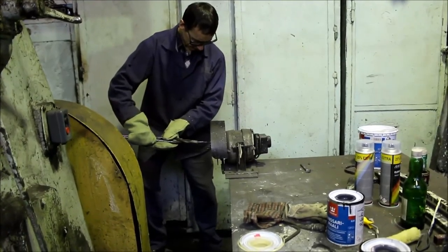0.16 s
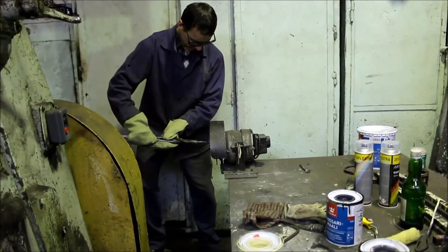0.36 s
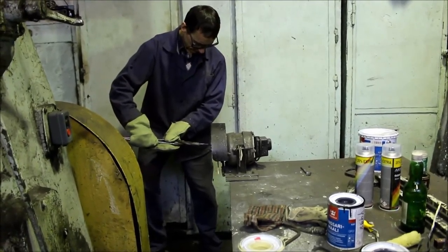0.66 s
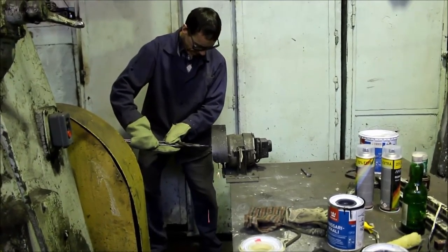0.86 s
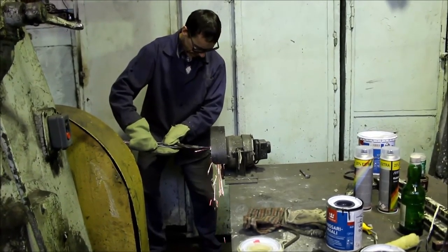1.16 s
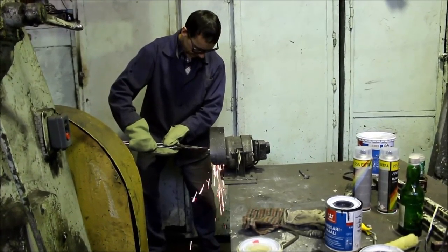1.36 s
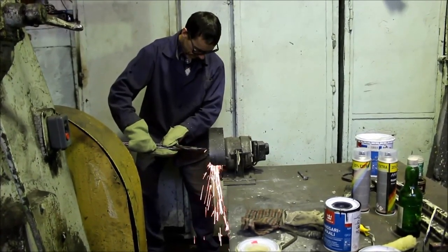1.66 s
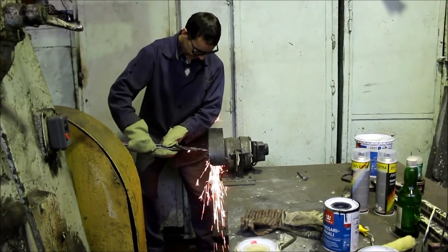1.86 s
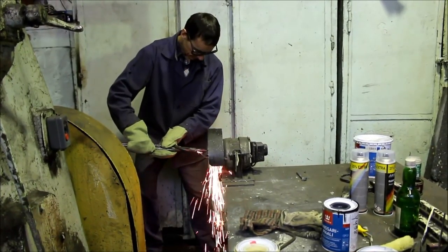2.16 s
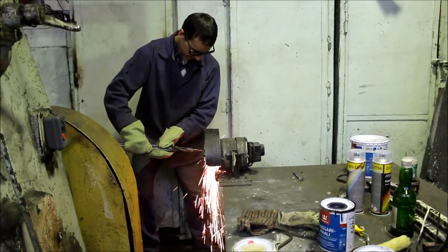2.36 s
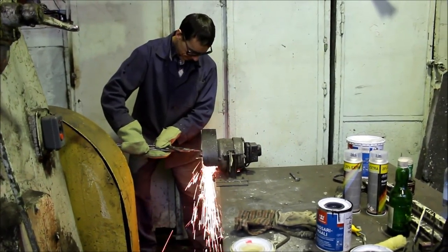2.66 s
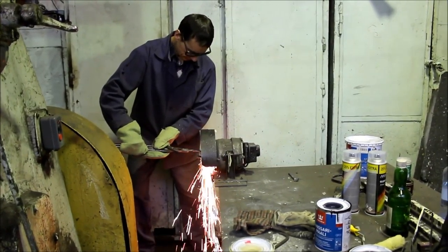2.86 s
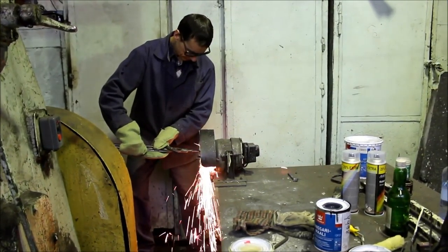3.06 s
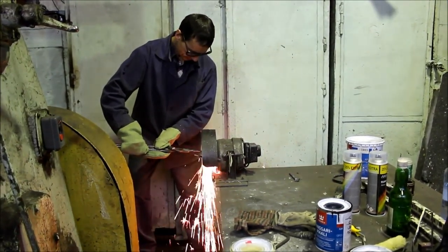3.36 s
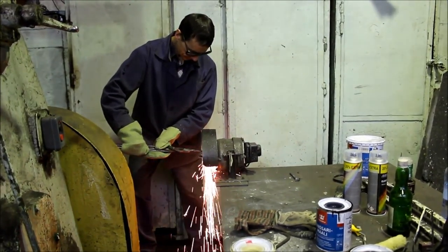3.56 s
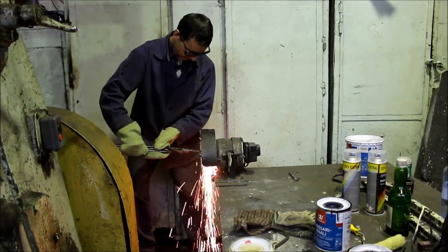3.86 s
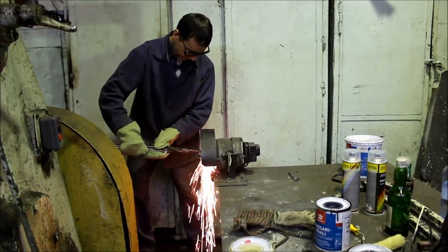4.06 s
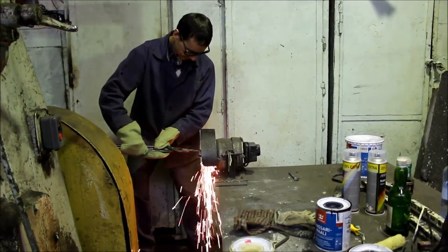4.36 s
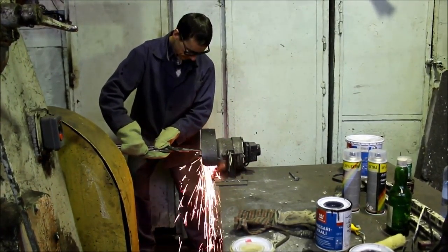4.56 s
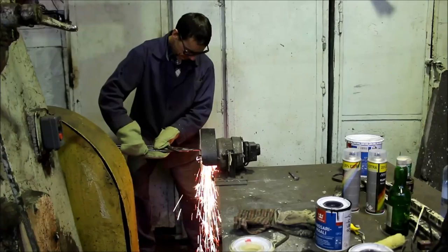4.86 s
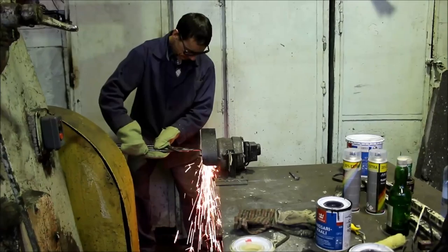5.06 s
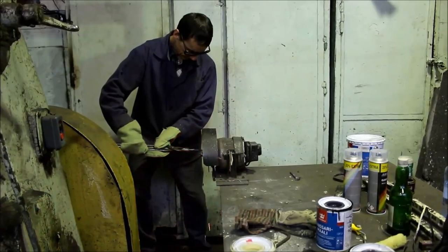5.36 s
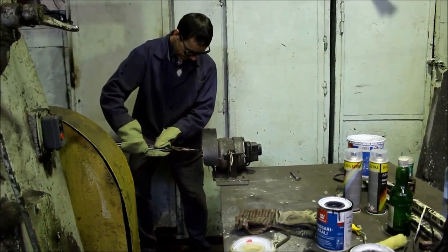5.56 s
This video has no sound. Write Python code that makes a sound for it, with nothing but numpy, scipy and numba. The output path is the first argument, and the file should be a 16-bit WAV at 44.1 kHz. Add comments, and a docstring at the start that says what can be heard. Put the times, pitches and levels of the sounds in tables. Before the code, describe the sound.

A bench grinder chews at steel with sizzling, pulsing noise and a shrill chatter tone near twelve hundred hertz. After nearly three seconds it stops, leaving rumble and a recovering motor drone, a scraping skid and small gritty spits. A second, uneven pass screeches for about a second before the drone returns. Reverberant workshop; the microphone's automatic gain raises the quiet parts.

```python
"""In a workshop a steel bar is pressed against the wheel of a bench grinder, lifted off, and pressed on again.
The same grit comes round on every turn, so the rasp (shaped noise) throbs and rings the bar's resonances.
The bar chatters, sings and screeches, and its contact slides; the motor, a set of sines, sags under load.
In the pause the bar skids on the tool rest and grazes the wheel; the motor hum recovers and gain control
lets it swell up. Hard walls add a dense reverberant tail to the noises."""
import sys
import numpy as np
from scipy import signal
from scipy.fft import rfft, irfft, next_fast_len
from scipy.io import wavfile
from scipy.ndimage import map_coordinates
from numba import njit

SR = 44100
rng = np.random.default_rng(int(sys.argv[2]) if len(sys.argv) > 2 else 0)


def pcm_store(signal):
    """Save signal as 16-bit PCM."""
    levels = np.round(np.clip(np.atleast_2d(signal), -1, 1) * 32767)
    wavfile.write(sys.argv[1], SR, levels.astype(np.int16).T)


N = 252252
TIME = np.arange(N) / SR
PADDED = next_fast_len(N + SR)
FREQ = np.maximum(np.arange(PADDED // 2 + 1) * SR / PADDED, 1)


def undb(db):
    """Logarithmic level: decibels to amplitude gain."""
    return 10 ** (np.asarray(db) / 20)


def unit(x):
    """Normalisation: scale to rms 1."""
    return x / np.sqrt(np.mean(x ** 2))


def curves(table):
    """Linear interpolation: each column after the time as a value per sample."""
    s, *columns = np.transpose(table)
    return [np.interp(TIME, s, column) for column in columns]


def since(start_s):
    """Elapsed time: seconds since a moment, zero before it."""
    return np.maximum(TIME - start_s, 0)


def envelope(start_s, length_s, attack_s, release_s, fade_db_per_s=0):
    """Growth and decay: a straight attack, a hold that may fade, an exponential release."""
    age = since(start_s)
    attack = np.minimum(age / attack_s, 1)
    release = np.exp(-since(start_s + length_s) / release_s)
    return attack * undb(-fade_db_per_s * age) * release


def filtered(x, response):
    """Linear filtering: multiply the spectrum by a frequency response."""
    return irfft(rfft(x, PADDED) * response, PADDED)[:N]


def colour(points):
    """Spectral envelope: response through (frequency [Hz], level [dB]) points on a log frequency axis."""
    hz, db = np.transpose(points)
    return undb(np.interp(np.log(FREQ), np.log(hz), db))


def shaped(x, points):
    """Spectral shaping: a sound given a broad spectrum, rms 1."""
    return unit(filtered(x, colour(points)))


def ringing(x, modes):
    """Modal resonance: a sound rung through a sum of damped resonators, rms 1."""
    response = 0
    for hz, width_hz, db in modes:
        response = response + undb(db) / (1 + 1j * (FREQ - hz ** 2 / FREQ) / width_hz)
    return unit(filtered(x, response))


def grains(spread_db):
    """Granular excitation: dense tiny impacts; a few are much larger, or much weaker if the spread is negative."""
    return unit(rng.standard_normal(N) * undb(spread_db * np.minimum(rng.exponential(size=N), 5)))


def rim(turns, memory, size=1780):
    """Cyclic excitation: random roughness read round the wheel; wear renews what memory does not keep."""
    fresh = rng.standard_normal((200, size))
    keep = np.clip(memory, 0, .995)
    worn, _ = signal.lfilter([np.sqrt(1 - keep ** 2)], [1, -keep], fresh[1:], axis=0, zi=keep * fresh[:1])
    return unit(map_coordinates(worn.ravel(), [turns * size], order=3))


def grit(turns, steadiness, memory, spread_db):
    """Periodic and random excitation: a steady contact repeats strikes each turn, a loose one meets new grains."""
    share = np.clip(steadiness, 0, 1)
    return np.sqrt(share) * rim(turns, memory) + np.sqrt(1 - share) * grains(spread_db)


HIGH_SIDE_TURN = 0.0681  # where in the turn the wheel's high side meets the bar


def high_side(turns):
    """Eccentricity: the wheel is slightly out of round and pushes harder once a turn."""
    return np.cos(2 * np.pi * (turns - HIGH_SIDE_TURN))


# the bar is held on the wheel:
# (start [s], length [s], steadiness of the contact at first [0-1], steadiness at the end [0-1])
HOLDS_ON_WHEEL = [(-0.1, 2.7, 0.87, 0.2), (3.813, 1.149, 0.67, 0.19)]
TOUCH_S, LIFT_S, RING_OUT_S = 0.0662, 0.0282, 0.31


def contact(release_s):
    """Contact gating: 1 while the bar is on the wheel, dying away after each lift."""
    return sum(envelope(s, length_s, TOUCH_S, release_s) for s, length_s, _, _ in HOLDS_ON_WHEEL)


def steadiness_of_contact():
    """Contact loosening: each pass starts firm and loosens as the steel wears away."""
    points = []
    for s, length_s, first, last in HOLDS_ON_WHEEL:
        points += [(s, first), (s + length_s, last)]
    return np.clip(curves(points)[0], 0, 1)


# the heavy wheel follows the load late; the sag is per unit of load
IDLE_HZ, SAG_HZ, INERTIA_S = 24.98, .34, .18


def shaft_turns(load):
    """Rotational inertia: turns of the shaft so far, its speed sagging in proportion to the smoothed load."""
    step = 1 / (INERTIA_S * SR)
    smoothed_load = signal.lfilter([step], [1, step - 1], load)
    return np.cumsum(IDLE_HZ - SAG_HZ * smoothed_load) / SR


# motor lines: (multiple of the shaft speed, relative idle level [dB], change at a load of 1 [dB])
MOTOR_LINES = [(2, -24, 0), (4, -10.5, -1), (8, 3, -25), (9, -4, -13), (10, -3, -10), (12, -11, -6),
               (16, -14, -3), (20, -10, 0), (28, -17, 0)]
HUM_DB, HUM_RECOVERY_S, HUM_LOAD_POWER = -22.5, .65, 1.4


def hum(turns, load):
    """Motor hum: the motor's electrical hum and the shaft's harmonics, as sines kept at multiples of the shaft
    speed; under load the drone fades and wavers until it breaks up."""
    lines = 0
    for multiple, db, load_db in MOTOR_LINES:
        waver_db = (1.5 + 4 * load) * rim(turns, memory=.7, size=1)
        level = undb(db + load_db * load ** HUM_LOAD_POWER + waver_db)
        lines = lines + level * np.sin(2 * np.pi * (multiple * turns + rng.random()))
    return undb(HUM_DB) * lines


# spectrum of the rumble: (frequency [Hz], relative level [dB per Hz])
RUMBLE_SPECTRUM = [(25, -34), (42, -52), (55, -14.5), (150, -2.5), (400, -3.5), (750, -6.5), (1700, -6.5),
                   (2100, -11.5), (4700, -13.5), (6000, -19.5), (9000, -24.5), (13000, -35), (16000, -101)]
# resonances of the frame: (frequency [Hz], width [Hz], relative level [dB])
FRAME_MODES = [(1160, 36, -27), (1470, 80, 4.5), (1745, 61, 10.5), (2710, 86, 1.5), (3110, 140, -3),
               (3960, 40, -1.5), (4310, 150, -3.5), (7800, 51, -11)]
SWELL_START_S, SWELL_LENGTH_S, SWELL_HZ, SWELL_DB = 5.3, .14, 1458, -24
# shared by this swell and the singing modes of the bar
SING_WIDTH_HZ, SING_ATTACK_S, SING_RELEASE_S = 18, .07, .05


def bearings(turns):
    """Forced vibration: bearings and the air round the wheel rumble and ring the frame; one resonance swells."""
    rumble = shaped(grit(turns, steadiness=0.2, memory=0.943, spread_db=0.5), RUMBLE_SPECTRUM)
    knocks = grit(turns, steadiness=0.072, memory=1.0, spread_db=3.5)
    swelling = envelope(SWELL_START_S, SWELL_LENGTH_S, SING_ATTACK_S, SING_RELEASE_S)
    swell = swelling * ringing(knocks, [(SWELL_HZ, SING_WIDTH_HZ, 0)])
    return undb(-18.5) * rumble + undb(-23.5) * ringing(knocks, FRAME_MODES) + undb(SWELL_DB) * swell


# spectra of the cutting: (frequency [Hz], relative level [dB per Hz])
RASP_SPECTRUM = [(35, -82), (85, -15), (200, -5.5), (330, -21), (520, -6.5), (720, -5.5), (1050, -3.5),
                 (1500, -1.5), (2500, -4), (3300, -1), (4200, -0.5), (5500, 2), (6500, -5.5), (9000, -48)]
SIZZLE_SPECTRUM = [(4000, -13.5), (6300, 1.5), (8500, -1), (10500, 2), (12500, -3.5), (14000, -8),
                   (16000, -24)]
# resonances of the bar, low, middle and high: (frequency [Hz], width [Hz], relative level [dB])
BAR_LOW_MODES = [(957, 38, -1.5), (1195, 56, -2), (1328, 30, -7), (1360, 360, -4)]
BAR_MID_MODES = [(1867, 38, 8.5), (2148, 94, 4.5), (2945, 110, 6), (3750, 82, 3), (4130, 370, 10),
                 (4630, 260, -0.5), (4780, 140, -9)]
BAR_HIGH_MODES = [(7400, 150, 9), (8370, 370, 8.1), (9180, 200, 8.5), (10360, 120, 4)]
# levels at 0 dB pressure; the sizzle and the ring grow more slowly than the rasp (dB per dB of pressure)
RASP_DB, SIZZLE_DB, RING_DB = -7.5, -10.5, -11.5
SIZZLE_GROWTH, RING_GROWTH = 0.77, 0.95


def grinding(turns, pressure, steady):
    """Abrasion: grit tears at the steel and rings the bar; the high side and the wheel's bumps vary the force."""
    push = high_side(turns)
    force = undb(1.0 * steady * push + 0.76 * rim(turns, memory=0.32, size=20))
    strikes = force * grit(turns, steady, memory=0.99, spread_db=2.5)
    rasp = undb(-1.0) * shaped(strikes, RASP_SPECTRUM) + undb(-4.0) * ringing(strikes, BAR_MID_MODES)
    # a firm contact damps the bar's low modes, which feel the high side most
    ring = undb(-10 * steady) * (1 + .5 * steady * push) * ringing(strikes, BAR_LOW_MODES)
    # hot chips tear off and sizzle
    chips = force * grit(turns, .5 * steady, memory=1.0, spread_db=4.5)
    sizzle = undb(-1.0) * shaped(chips, SIZZLE_SPECTRUM) + undb(-6.0) * ringing(chips, BAR_HIGH_MODES)
    cutting = undb(RASP_DB) * pressure * rasp + undb(SIZZLE_DB) * pressure ** SIZZLE_GROWTH * sizzle
    ring_level = undb(RING_DB) * pressure ** RING_GROWTH
    return contact(LIFT_S) * cutting + contact(RING_OUT_S) * ring_level * ring


# one mode of the bar sings for a while: (start [s], length [s], frequency [Hz], relative level [dB])
SINGING_MODES = [(-.1, .36, 1388, 5), (-.1, .36, 1835, 0), (-.1, .4, 4490, -4), (-.1, .4, 4725, 0),
                 (.35, 1, 3697, -1), (0, 1.3, 4205, 1), (.66, .55, 4727, -1), (.6, .68, 5715, 0),
                 (1, .38, 2905, 3), (1.25, .4, 4575, -2), (1.45, .55, 1840, -5), (1.68, .42, 8350, -4),
                 (1.88, .37, 4400, -1), (2.45, .15, 3700, 3), (3.86, .36, 1412, 0), (3.87, .48, 3700, -2),
                 (4.54, .11, 2953, 2), (4.15, .52, 4190, 0)]
SING_DB = -20.5


def singing(turns, steady):
    """Selective excitation: as the contact wanders along the bar, the grit sets one mode after another singing."""
    strikes = grit(turns, steady, memory=.98, spread_db=1.5)
    out = 0
    for s, length_s, hz, db in SINGING_MODES:
        swell = envelope(s, length_s, SING_ATTACK_S, SING_RELEASE_S)
        out = out + undb(SING_DB + db) * swell * ringing(strikes, [(hz, SING_WIDTH_HZ, 0)])
    return out


# gliding scrapes: (start [s], length [s], from [Hz], to [Hz], bow of the glide [1 = straight], width [Hz],
# level [dB])
GLIDES = [(-.01, .06, 1300, 1650, 1, 260, -12), (.24, .32, 3850, 4330, .4, 60, -17),
          (1.95, .29, 340, 150, .55, 70, -20), (2.03, .32, 2350, 2150, 1, 600, -17),
          (4.25, .16, 2970, 2770, 3, 60, -19), (4.465, .09, 1400, 2150, 1.3, 260, -15),
          (4.56, .4, 1440, 1370, 1, 90, -20), (4.81, .11, 2830, 2920, 1, 130, -16.5)]


def slides():
    """Moving-contact friction: narrow-band noise glides up or down as the contact slides along the bar."""
    out = 0
    for s, length_s, from_hz, to_hz, bow, width_hz, db in GLIDES:
        hz = from_hz + (to_hz - from_hz) * np.minimum(since(s) / length_s, 1) ** bow
        slips = rng.standard_normal(N) + 1j * rng.standard_normal(N)
        lowpass = signal.butter(2, width_hz / 2, fs=SR, output="sos")
        unrest = signal.sosfilt(lowpass, slips)
        # complex noise moved up to the gliding frequency
        scrape = unit(np.real(unrest * np.exp(2j * np.pi * np.cumsum(hz) / SR)))
        out = out + undb(db) * envelope(s, length_s, attack_s=0.0055, release_s=0.01) * scrape
    return out


def locked_note(turns, ripples, bend):
    """Phase locking: a whole number of cycles per turn; between two counts, both sound and beat."""
    angle = 2 * np.pi * (turns - HIGH_SIDE_TURN)
    count, share = np.divmod(ripples, 1)
    return (1 - share) * np.sin(count * angle + bend) + share * np.sin((count + 1) * angle + bend)


# the bar falls into chatter, one curve per bout: (time [s], level [dB], ripples [per turn],
# swing of phase in each turn [rad], throb [dB], level of the bouncing low note [dB])
CHATTER_BOUTS = [
    [(0, -12, 48.3, -.4, 1, -40), (.1, -8, 48.4, -.4, 1.5, -35), (.24, -1.5, 48.4, -.4, 1.5, -35),
     (.36, -3.5, 48.38, -.4, 1.5, -40), (.43, -6.5, 48.2, -.4, 1.5, -40), (.5, -9, 48.1, .3, 1, -45),
     (.66, -10.5, 48.1, .7, 1, -40), (.72, -10, 49, 2.6, 5, -22), (.95, -10.5, 49, 3, 5, -22),
     (1.03, -10, 49, 3.4, 5, -15), (1.3, -10.5, 48, 4, 4, -8), (1.37, -12, 48, 2.5, 4, -30),
     (1.44, -26, 48, 1, 2, -45)],
    [(1.98, -22, 50.5, 1, 1, -40), (2.08, -6, 50.2, 1.5, 1, -25), (2.19, -11, 49.3, 1.8, 1, -15),
     (2.26, -4, 47.2, 1.2, 2, -9), (2.41, -6, 47.8, 1, 1, -30), (2.45, -14, 48, 1.2, 1, -35),
     (2.48, -5.5, 50, 1.6, 1, -30), (2.54, -6.5, 47, 2, 1, -12), (2.63, -9, 47, 2.4, 1, -35),
     (2.71, -24, 46, 2.4, 1, -45)],
    [(3.85, -24, 48, 1, 2, -40), (3.89, -9, 48, .7, 2, -35), (4.08, -9.5, 48, 1, 2, -35),
     (4.17, -13, 48.3, 1.3, 2, -35), (4.26, -10.5, 50.8, .6, 1, -35), (4.33, -28, 51, 1, 1, -35),
     (4.41, -28, 48, .4, 1, -40), (4.435, -11, 48, .4, 1, -40), (4.47, -13, 48, .4, 1, -40),
     (4.49, -30, 48, .4, 1, -40)],
]
BOUNCE_RIPPLES = 37  # cycles per turn
CHATTER_RATTLE_DB, CHATTER_EDGE_S = 1.5, .01


def chatter(turns, steady):
    """Regenerative chatter: the bar locks onto ripples round the rim and sings, throbbing and bending once a
    turn.

    A loose contact rattles, and at times a lower note bounces twice a turn."""
    push = high_side(turns)
    unevenness = .3 * rim(turns, memory=.95, size=8)
    strikes = grit(turns, steady, memory=.9, spread_db=1.5)
    rattle = undb(CHATTER_RATTLE_DB) * (1 - steady) ** 2 * ringing(strikes, BAR_LOW_MODES)
    bounce_phase = 2 * np.pi * BOUNCE_RIPPLES * turns + .6 * rim(turns, memory=.9, size=8)
    bounce = push ** 6 * (1 + .3 * push) * np.sin(bounce_phase)
    out = 0
    for bout in CHATTER_BOUTS:
        db, ripples, swing, throb_db, bounce_db = curves(bout)
        note = locked_note(turns, ripples, unevenness - swing * push)
        start_s, end_s = bout[0][0], bout[-1][0]
        gate = envelope(start_s, end_s - start_s, CHATTER_EDGE_S, CHATTER_EDGE_S)
        out = out + gate * (undb(db + throb_db * push) * (note + rattle) + undb(bounce_db) * bounce)
    return out


# the bar's corner digs in: (start [s], length [s], level [dB])
DIG_INS = [(0.654, 0.14, -12.5), (.95, 0.15, -37), (1.19, 0.15, -15), (2.48, 0.1, -13), (3.88, 0.12, -14.5),
           (4.548, 0.063, -16), (4.77, 0.063, -9.5)]
# resonances of the bar's corner: (frequency [Hz], width [Hz], relative level [dB])
CORNER_MODES = [(1430, 40, 0), (2877, 140, 18), (3730, 180, 8), (3780, 280, 13)]
SCREECH_ATTACK_S, SCREECH_RELEASE_S = 0.025, 0.099


def screech():
    """Stick-slip: friction at the bar's corner, as impulsive noise, rings its upper modes."""
    digging = 0
    for s, length_s, db in DIG_INS:
        digging = digging + undb(db) * envelope(s, length_s, SCREECH_ATTACK_S, SCREECH_RELEASE_S)
    return digging * ringing(grains(spread_db=-5.0), CORNER_MODES)


# spectrum of steel scraping on steel: (frequency [Hz], relative level [dB per Hz])
SCRAPE_SPECTRUM = [(400, 8), (1100, 9), (1600, 10.5), (3000, 6.5), (5000, 7), (7000, -3.5), (10000, -10),
                   (12000, -36), (16000, -45)]
# resonances of the tool rest: (frequency [Hz], width [Hz], relative level [dB])
TOOL_REST_MODES = [(1490, 32, 5), (1620, 50, -5), (1810, 70, -2), (2200, 50, 1), (2730, 50, 2),
                   (3230, 40, -3), (3560, 50, -4), (4490, 45, -2), (5100, 80, -10), (5470, 35, -7),
                   (5990, 30, -3), (9600, 80, 0)]
SKID_START_S, SKID_LENGTH_S, SKID_DB, SKID_FADE_DB_PER_S = 2.928, 0.13, -11, 48
SKID_HISS_DB = -2.5  # scrape relative to the ringing rest


def skid():
    """Sliding friction: steel judders over the tool rest, scraping and ringing it, and fades as it goes."""
    sliding = envelope(SKID_START_S, SKID_LENGTH_S, attack_s=0.02, release_s=0.045,
                       fade_db_per_s=SKID_FADE_DB_PER_S)
    slips = shaped(grains(spread_db=3.5), SCRAPE_SPECTRUM)
    return undb(SKID_DB) * sliding * (ringing(slips, TOOL_REST_MODES) + undb(SKID_HISS_DB) * slips)


# an edge of the bar catches the grit, each bite starting one rise time early:
# (time [s], relative level [dB], decay [s])
EDGE_BITES = [(3.277, -25, 0.01), (3.3, -40, 0.081), (3.325, -22, 0.0024), (3.398, -31, 0.0055),
              (3.407, -23.5, 0.0035), (3.437, -13.5, 0.0012), (3.757, -29, 0.0055), (3.815, -19.5, 0.011),
              (3.857, -18, .005), (4.544, -14, 0.014), (4.785, -13.5, 0.01), (4.944, -20, 0.0072)]
# spectrum of a bite: (frequency [Hz], relative level [dB per Hz])
BITE_SPECTRUM = [(80, -10), (500, 13), (2000, 4), (5000, 10.5), (7000, 7.5), (10000, 11.5), (12500, 3),
                 (16000, -3)]
BITE_SPREAD_DB = 2


def bites(rise_s=0.002):
    """Impulsive contact: short bright spits of noise where an edge touches the wheel."""
    spits = 0
    for s, db, decay_s in EDGE_BITES:
        age = since(s - rise_s)
        spits = spits + undb(db) * (1 - np.exp(-age / rise_s)) * np.exp(-age / decay_s)
    return undb(16.5) * spits * shaped(grains(BITE_SPREAD_DB), BITE_SPECTRUM)


def reflections(t60_low_s=0.66, t60_high_s=0.18, gap_s=0.00187):
    """Reverberation: response of the hard walls, a dense tail whose treble dies first."""
    noise = rng.standard_normal(N) * (TIME > gap_s)
    low = filtered(noise, 1 / (1 + (FREQ / 4000) ** 2))
    # 1000 to 1 in amplitude is a decay of 60 dB
    tail = low * 1000 ** (-TIME / t60_low_s) + (noise - low) * 1000 ** (-TIME / t60_high_s)
    return rfft(tail / np.sqrt(np.sum(tail ** 2)), PADDED)


# width of the room's sound: (frequency [Hz], side relative to mid [dB])
ROOM_WIDTH = [(40, -5), (120, -16.5), (280, -23), (500, -20.5), (1000, -12), (2000, -10), (4000, -7.5),
              (8000, -1), (12000, 1)]


def workshop(x, wet_db):
    """Diffuse field: direct sound and reflections, which differ left and right, most in the treble."""
    wet = undb(wet_db)
    mid = filtered(x, (1 + wet * reflections()) / np.hypot(1, wet))
    side_tail = reflections(t60_low_s=0.31, t60_high_s=0.092, gap_s=0.00075)
    side = filtered(x, side_tail * colour(ROOM_WIDTH))
    return np.array([mid + side, mid - side])


# balance: (frequency [Hz], left minus right [dB])
BALANCE = [(120, 2), (500, 0), (1100, -1.5), (2000, -1), (4000, 0.5), (9000, 1.4)]


def placed(stereo):
    """Interchannel level difference: the hiss leans to the left, the bar's low ring to the right."""
    lean = np.sqrt(colour(BALANCE))
    return np.array([filtered(stereo[0], lean), filtered(stereo[1], 1 / lean)])


# how hard the hand presses the bar on: (time [s], pressure [dB])
HAND_PRESSURE = [(0, -1), (.27, 1.5), (.58, 0), (.75, 1.5), (1.28, .5), (1.42, -5.5), (1.95, -6.5),
                 (2.27, 3), (2.44, -2.5), (2.53, 2.5), (2.6, -2), (3.86, -6.5), (4.27, -0.5), (4.38, -4),
                 (4.51, -6), (4.545, 1.5), (4.63, 0), (4.69, -4), (4.76, -5), (4.79, 1.5), (4.85, -1),
                 (4.925, -6), (4.95, -5), (5.06, -7)]


def scene():
    """Coupled sources: the hand's pressure drives the grinding and slows the shaft, which paces hum and throb."""
    pressure = undb(curves(HAND_PRESSURE)[0])
    steady = steadiness_of_contact()
    turns = shaft_turns(pressure * contact(LIFT_S))
    motor = hum(turns, pressure * contact(HUM_RECOVERY_S))
    noises = bearings(turns) + grinding(turns, pressure, steady) + singing(turns, steady) + slides()
    noises = noises + screech() + skid() + bites()
    return placed(workshop(noises, wet_db=-8.5) + chatter(turns, steady) + motor)


@njit
def gain_control(power, start_db, limit_db, attack, release_db, window_s):
    """Feedback compression: gain in dB creeps up by release_db a second, pulled down while output exceeds the limit."""
    out, gain_db, heard = np.empty(len(power)), start_db, 1e-3
    for i in range(len(power)):
        gain = 10 ** (gain_db / 20)
        heard += (power[i] * gain ** 2 - heard) / (window_s * SR)
        excess = max(10 * np.log10(heard) - limit_db, 0.)
        gain_db += (release_db - attack * gain * excess) / SR
        out[i] = gain_db
    return out


CEILING, TOP_HZ = .9, 15650


def record(dry):
    """Compression, saturation, band limiting: rides the gain, rounds the tallest peaks and cuts the top."""
    gain_db = gain_control(np.mean(dry ** 2, axis=0), start_db=-15.5, limit_db=-20.0,
                           attack=68.0, release_db=12.5, window_s=0.0023)
    rounded = CEILING * np.tanh(dry * undb(gain_db) / CEILING)
    return signal.sosfilt(signal.ellip(10, .2, 80, TOP_HZ, fs=SR, output="sos"), rounded)


dry = scene()
out = record(dry)
pcm_store(out)
```